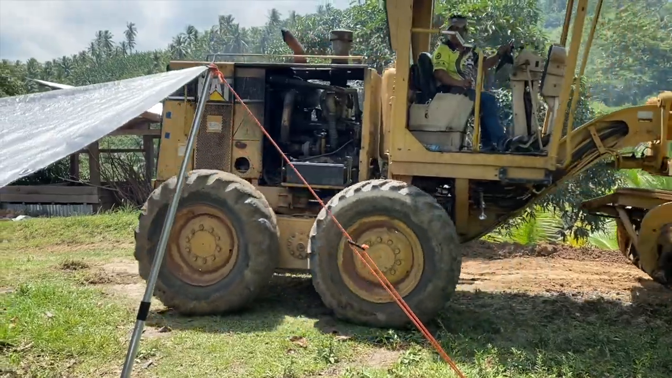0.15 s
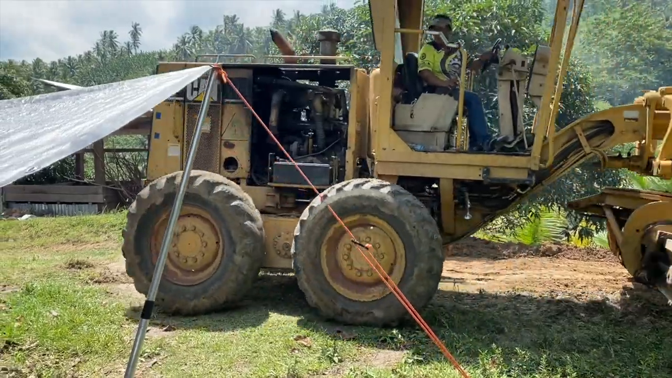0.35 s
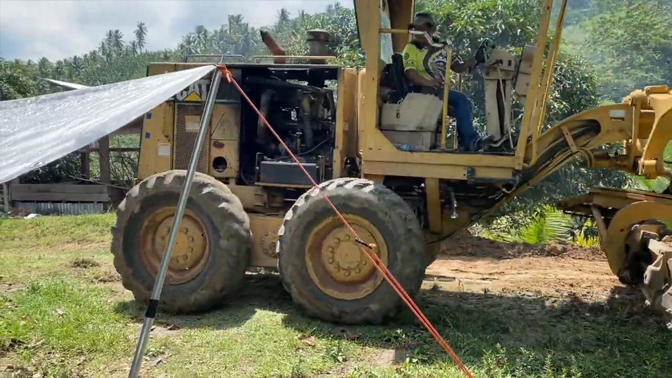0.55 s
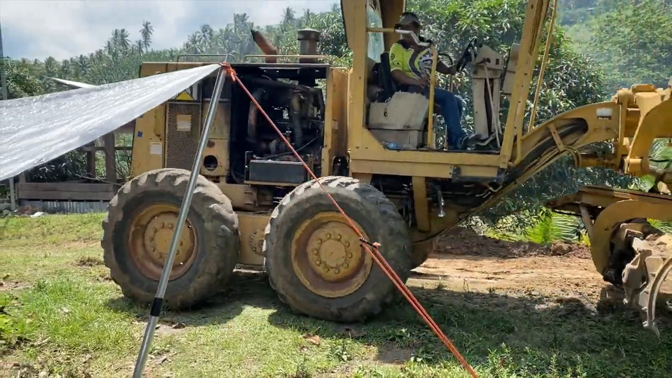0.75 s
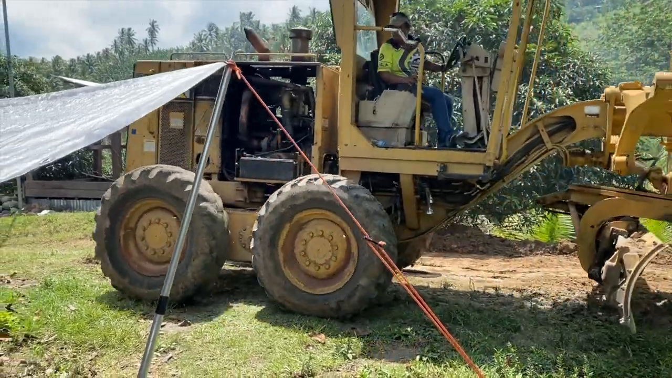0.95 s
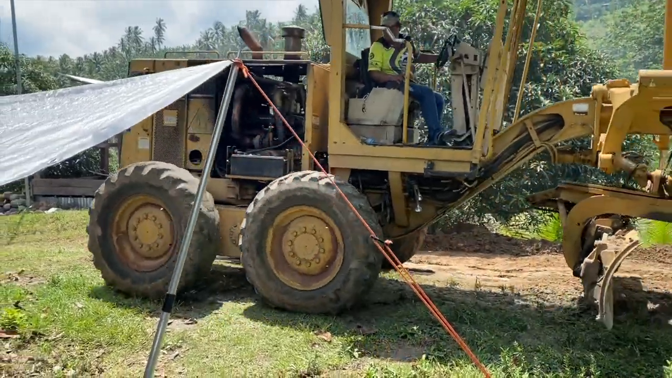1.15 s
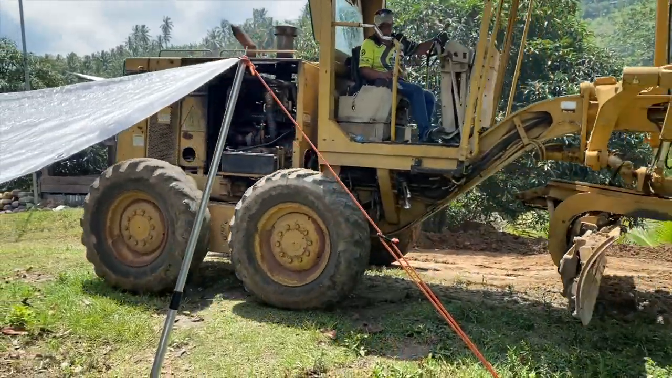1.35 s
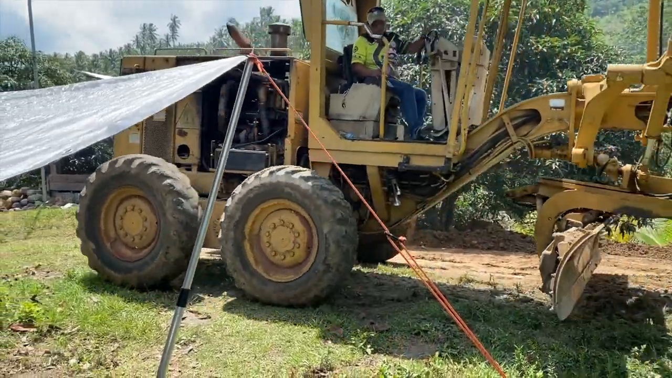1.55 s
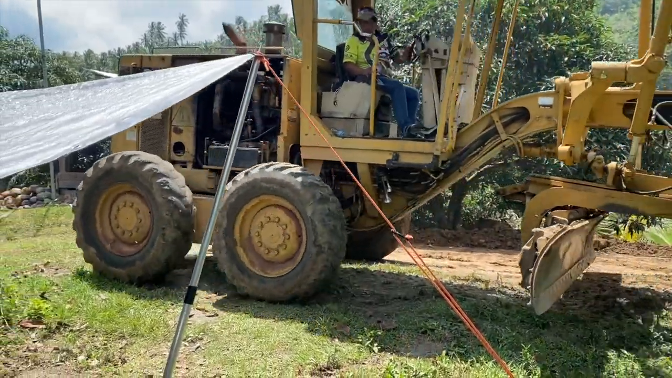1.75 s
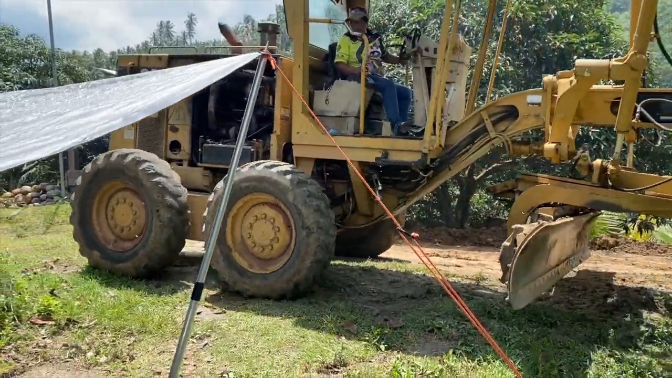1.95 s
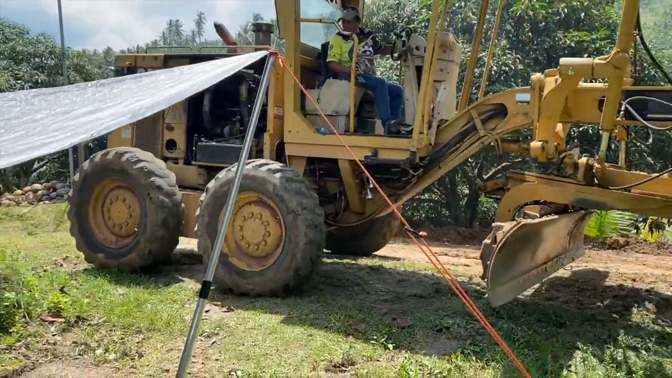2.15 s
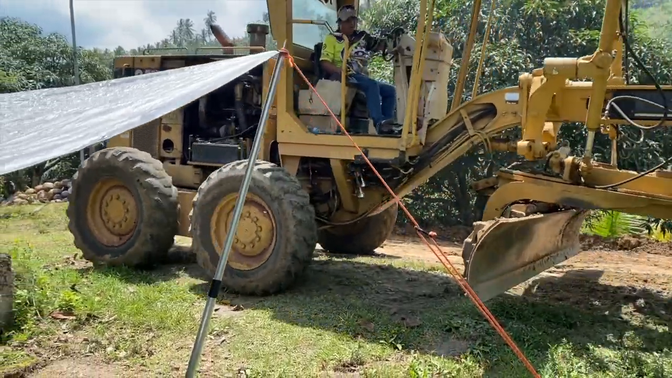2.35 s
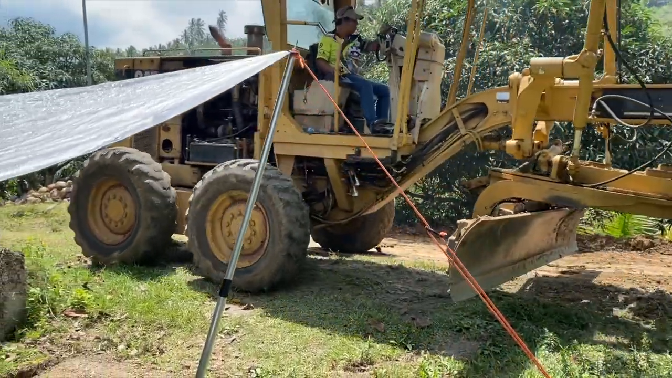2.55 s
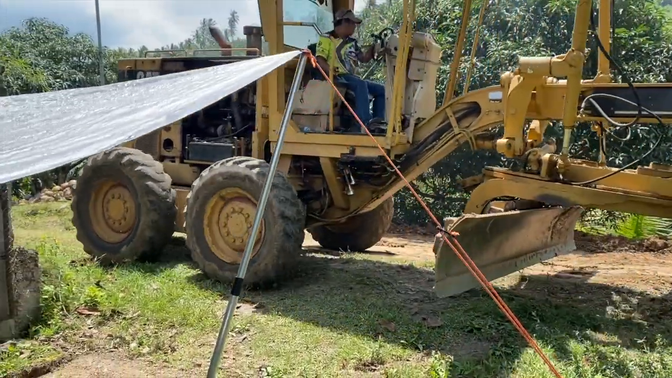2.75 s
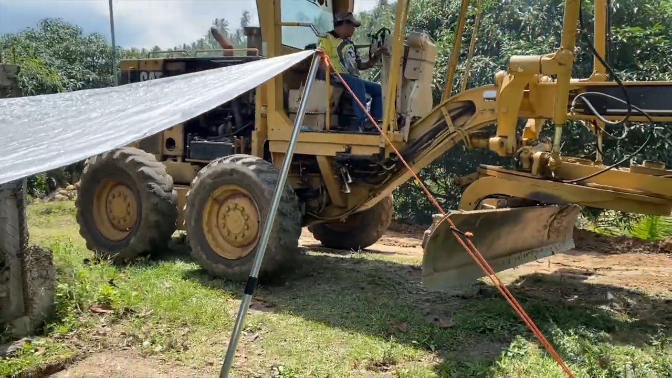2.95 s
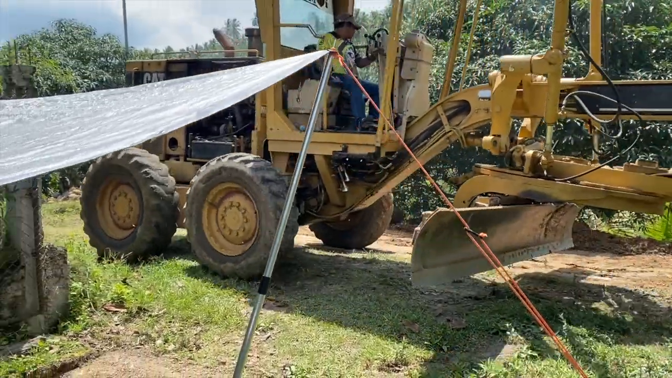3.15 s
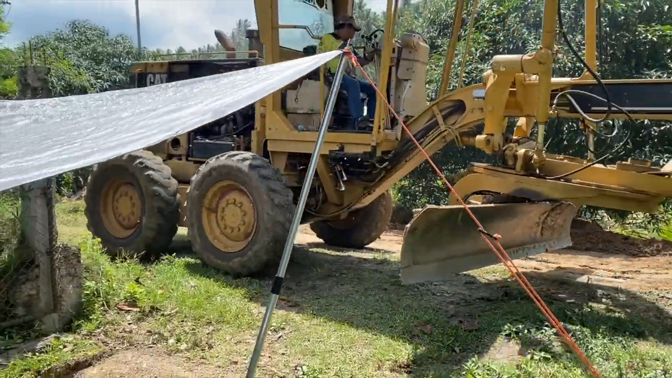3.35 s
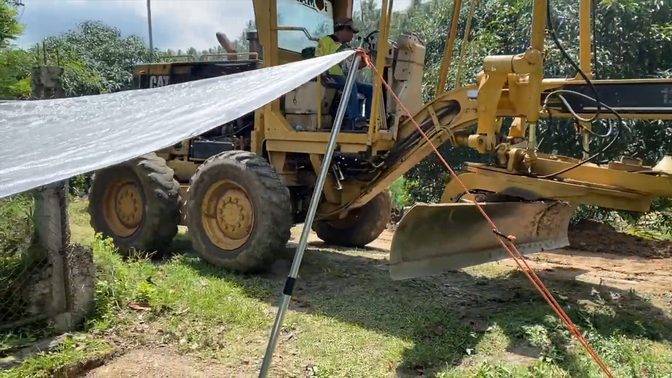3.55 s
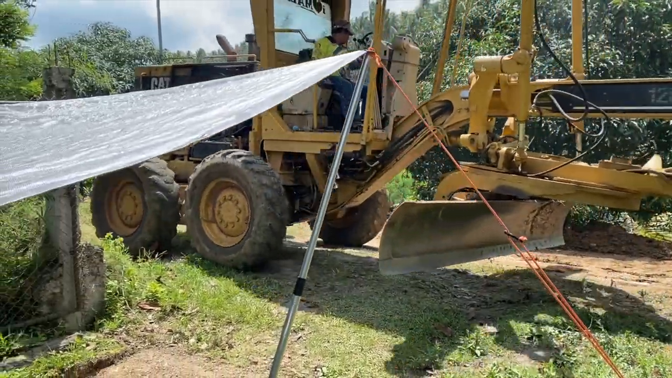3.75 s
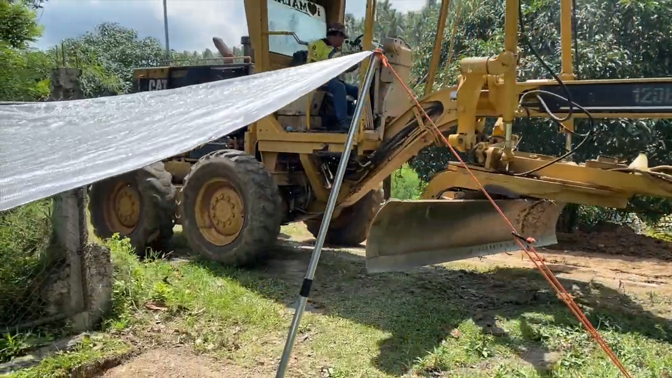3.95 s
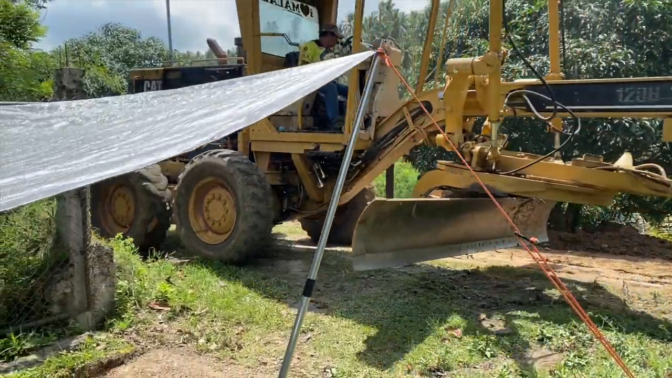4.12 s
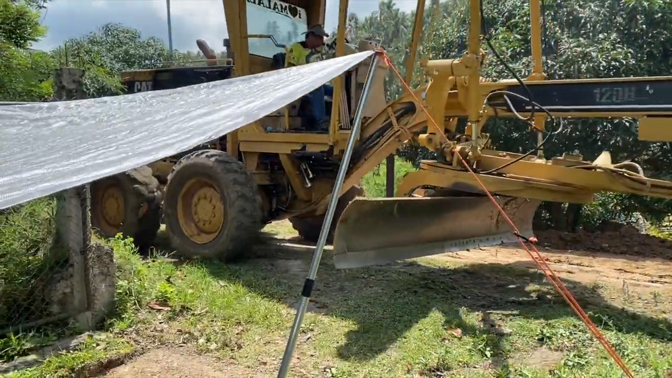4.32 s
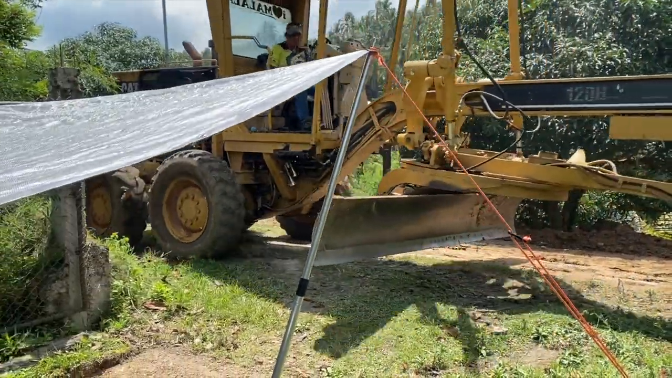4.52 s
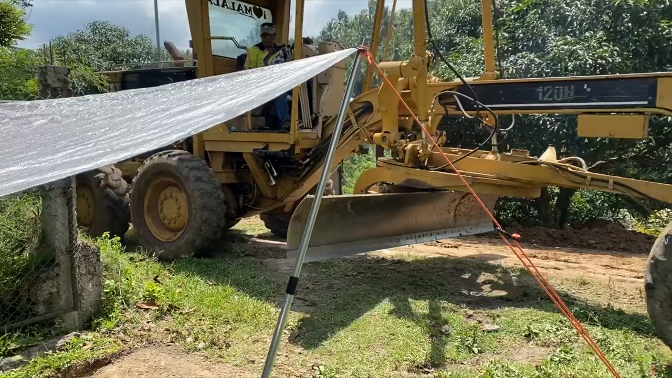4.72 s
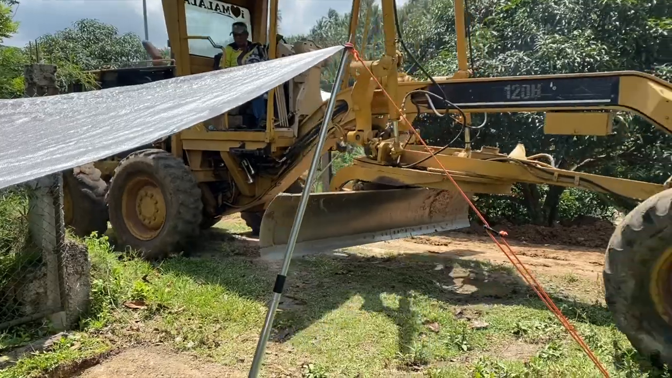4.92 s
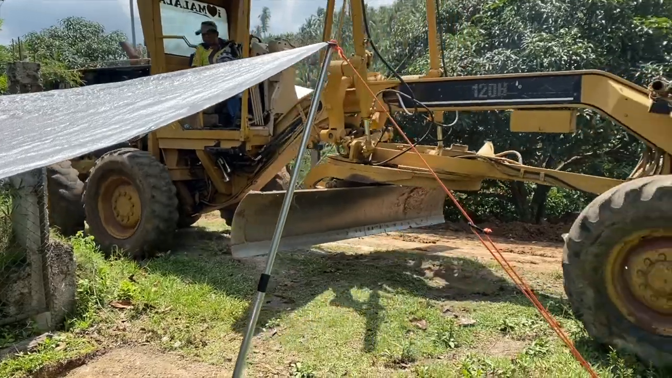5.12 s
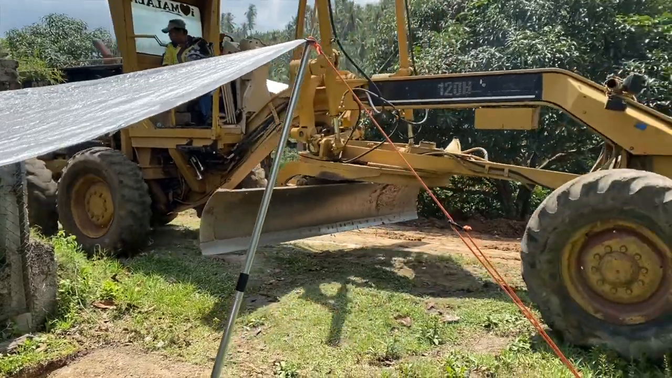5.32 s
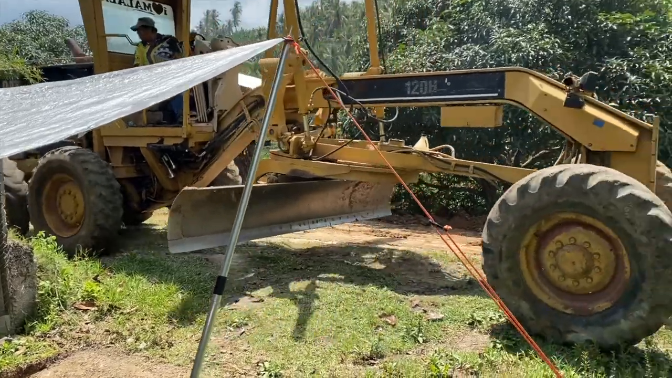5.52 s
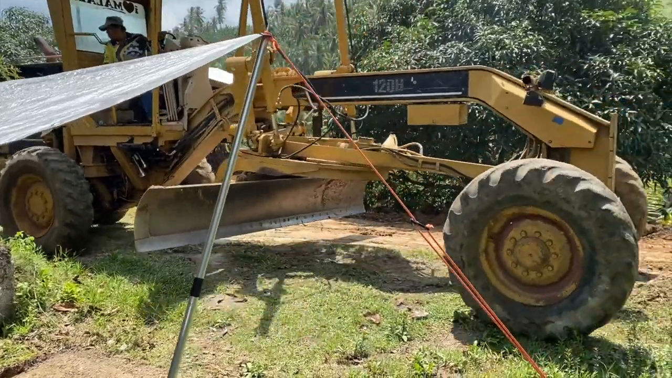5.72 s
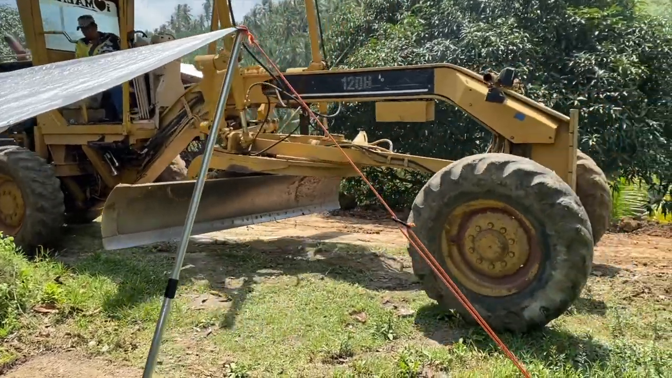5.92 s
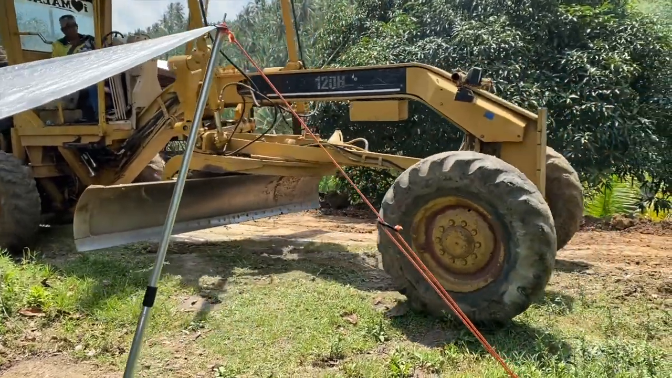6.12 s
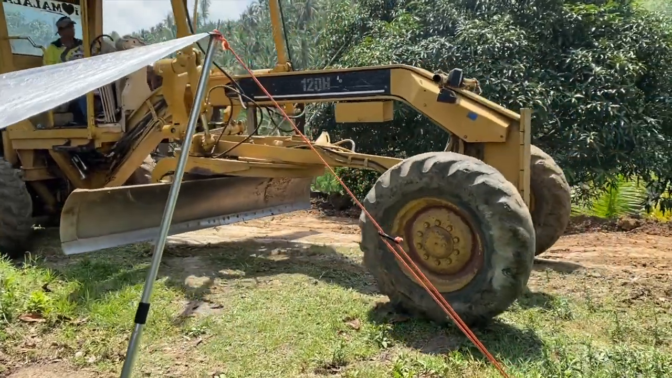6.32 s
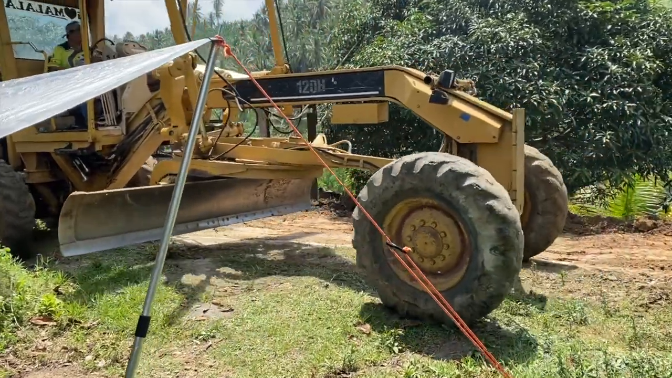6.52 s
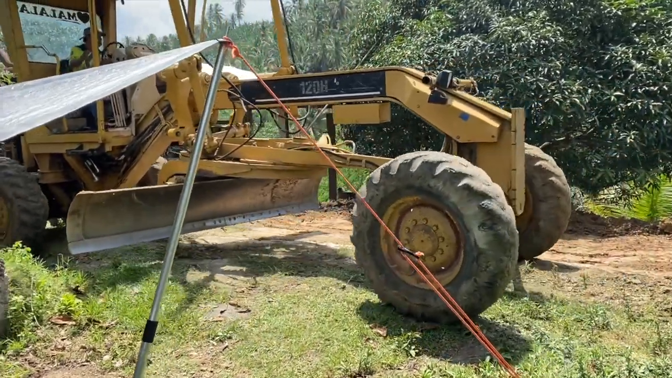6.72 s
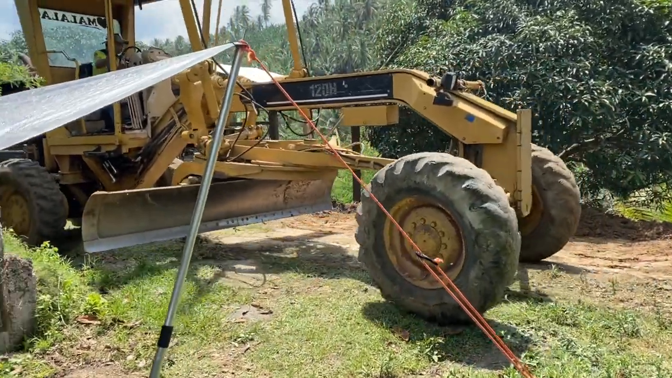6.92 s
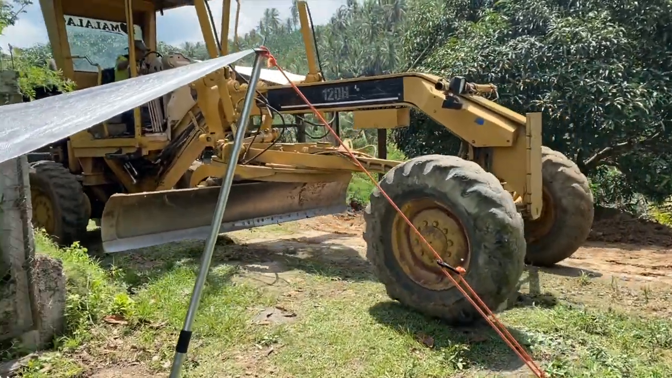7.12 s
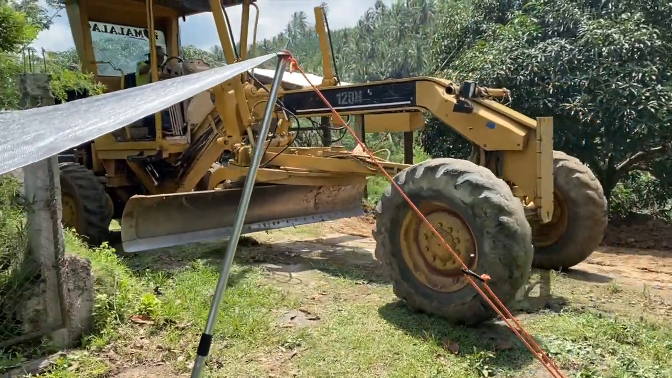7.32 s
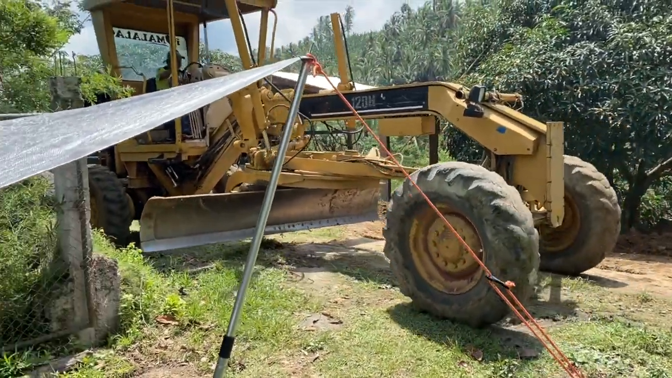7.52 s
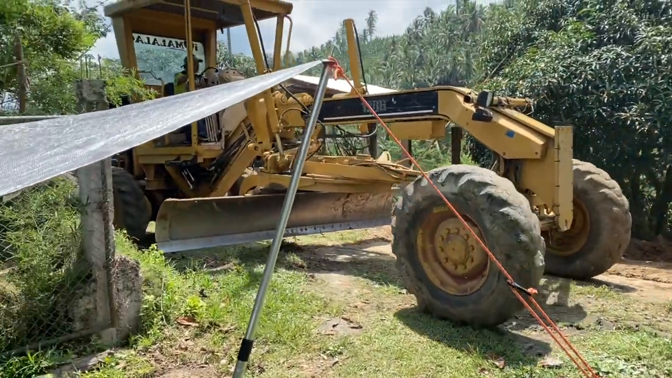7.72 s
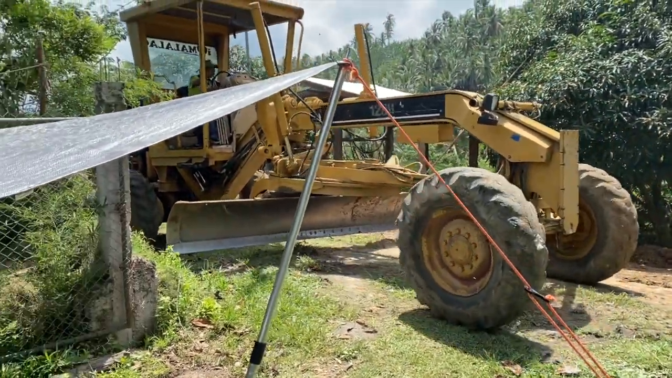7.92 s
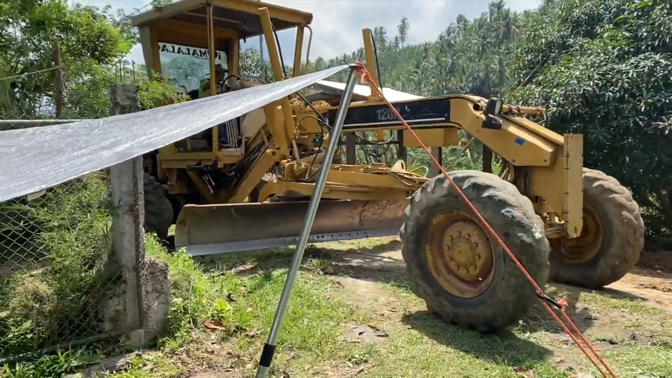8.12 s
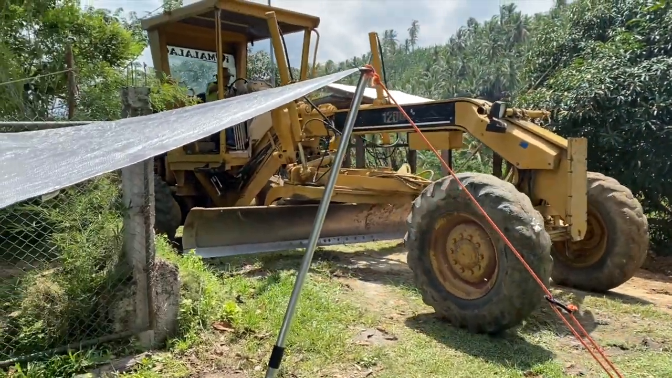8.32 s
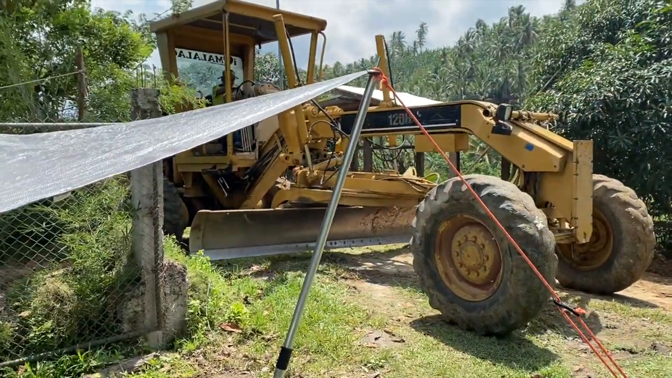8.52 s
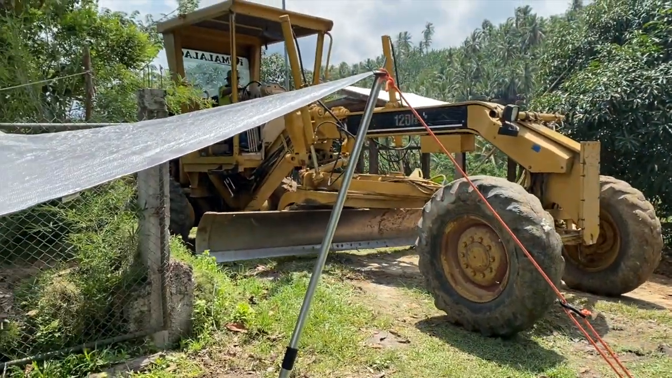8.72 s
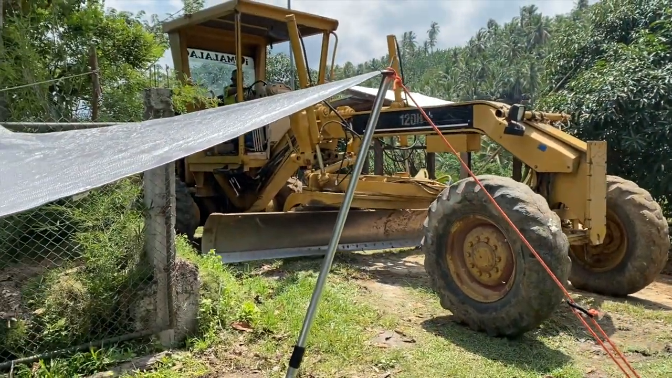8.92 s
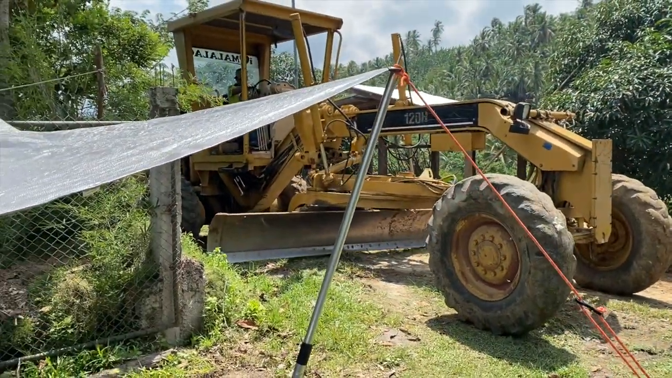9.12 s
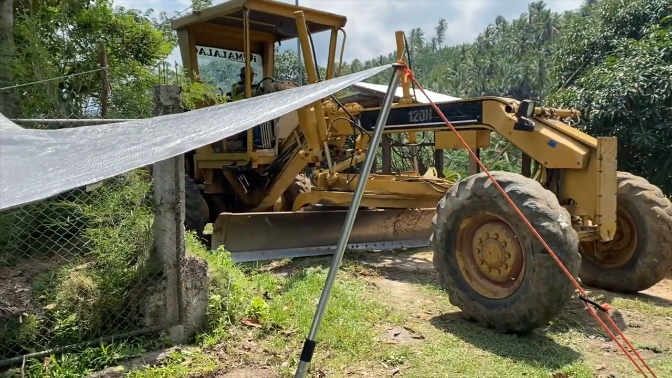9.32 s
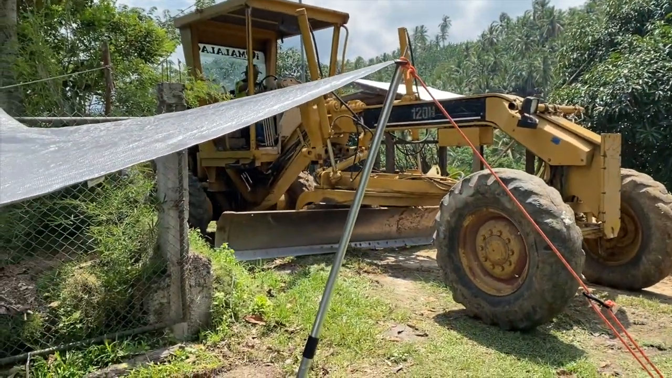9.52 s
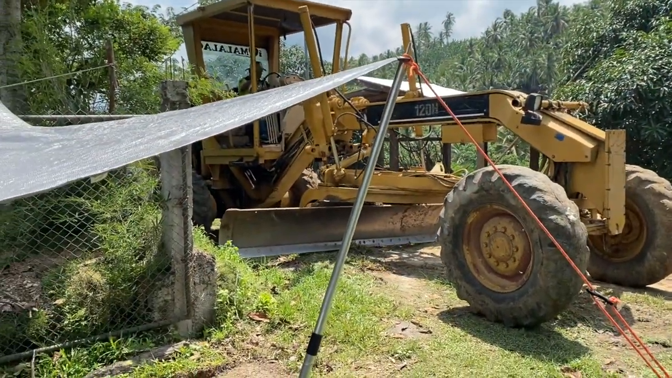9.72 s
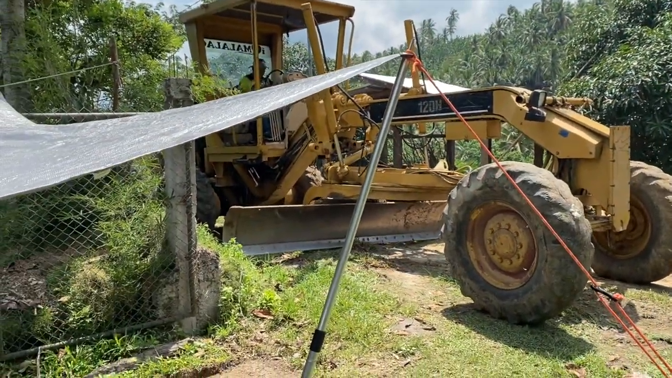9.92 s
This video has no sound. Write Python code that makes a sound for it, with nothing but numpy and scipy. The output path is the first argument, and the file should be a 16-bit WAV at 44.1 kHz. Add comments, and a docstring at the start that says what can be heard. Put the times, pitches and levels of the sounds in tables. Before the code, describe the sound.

Close by, a big road-grading machine rumbles slowly past with rattling diesel and gear whine, stops with a groan, and idles, knocking a loose panel.

```python
"""On a dirt track a motor grader with a six-cylinder diesel backs slowly past, a few metres away, and drops to idle.
Sines drone at the firing rate and whine at the gear meshes; filtered noise that partly repeats with the engine cycle
clatters, rumbles and ticks, changing colour as the open engine bay turns away behind the cab.
A tyre bumps, air hisses, the brakes groan, the frame thuds, and the idling engine knocks a loose panel;
near the end comes a faint, very high tick of band-limited noise."""
import sys
import numpy as np
from scipy import signal
from scipy.fft import rfft, irfft, next_fast_len
from scipy.io import wavfile
from scipy.ndimage import map_coordinates

SR = 44100
rng = np.random.default_rng(int(sys.argv[2]) if len(sys.argv) > 2 else 0)


def int16_out(signal):
    """Quantize to a 16-bit WAV file."""
    q = np.round(np.clip(np.atleast_2d(signal).T, -1, 1) * 32767)
    wavfile.write(sys.argv[1], SR, q.astype(np.int16))


N = 439236
T = np.arange(N) / SR
PADDED = next_fast_len(N, real=True)
FREQS = np.fft.rfftfreq(PADDED, 1 / SR)

# brake groans: (start [s], end [s], slip rate [Hz], its rise [Hz/s], level [dB], unevenness [0-1], resonance [Hz])
GROANS = [(7.249, 7.648, 56.75, 7.5, -34, 0, 305), (8.422, 8.64, 53, 2, -29.5, .25, 170)]
# modes of the loose panel: (frequency [Hz], width [Hz], relative level [dB])
PANEL = [(877, 68, -7), (1027, 77, -1.5), (1115, 66, 3.5), (1240, 63, -2), (1520, 56, -12.5)]


def undb(db):
    """Decibels to gain."""
    return 10 ** (np.asarray(db) / 20)


def unit(x):
    """Scale to rms 1."""
    return x / np.sqrt(np.mean(x ** 2))


def curves(rows):
    """Each column of a table, joined by straight lines in time."""
    s, *columns = np.transpose(rows)
    return [np.interp(T, s, column) for column in columns]


def ramp(start, length):
    """From 0 to 1 in a straight line."""
    return np.clip((T - start) / length, 0, 1)


def swell(start, end, edge):
    """A gate with soft edges."""
    return np.clip(np.minimum(T - start, end - T) / edge + .5, 0, 1)


def spells(rows, fade_db_per_s):
    """Level in dB that holds through each spell and falls evenly before and after it."""
    levels = []
    for start, end, db in rows:
        seconds_outside = np.maximum(np.maximum(start - T, T - end), 0)
        levels.append(db - fade_db_per_s * seconds_outside)
    return np.max(levels, axis=0)


def walk(rate):
    """Smooth random wander of rms 1, with `rate` random points a second."""
    knots = rng.standard_normal(int(rate * N / SR) + 4)
    coarse = map_coordinates(knots, [T[::50] * rate], order=2, mode="nearest")
    return unit(coarse).repeat(50)[:N]


def response(points):
    """Gain at every frequency from (frequency [Hz], gain [dB]) points."""
    hz, db = np.transpose(points)
    return undb(np.interp(np.log(FREQS + 1), np.log(hz), db))


def resonance(hz, width_hz):
    """Response of one damped mode."""
    damping = 1j * FREQS * width_hz
    return damping / (hz ** 2 - FREQS ** 2 + damping)


def modes(table, centre_hz, spread_hz):
    """Response of a ringing sheet, gain 1 for white noise."""
    sheet = sum(undb(db) * resonance(hz, width) for hz, width, db in table)
    sheet = sheet * resonance(centre_hz, spread_hz)
    return sheet / np.sqrt(np.mean(abs(sheet) ** 2))


def through(x, gain):
    """Filter by a response."""
    return irfft(rfft(x, PADDED) * gain, PADDED)[..., :N]


def scatter(x, smear_s):
    """Reflections inside the steel bay blur each blow over a few milliseconds."""
    echoes = rfft(rng.standard_normal(N) * np.exp(-T / smear_s), PADDED)
    return through(x, echoes / abs(echoes))  # phases only, so the colour stays


def rattle(firings, repeat):
    """Mid and side noise: a share recurs at the same crank angle of every six-firing cycle, the rest is new."""
    size = 6 * 1024
    angle = (firings / 6 * size).astype(int) % size
    recurring = rng.standard_normal((2, size))[:, angle]
    fresh = rng.standard_normal((2, N))
    return np.sqrt(repeat) * recurring + np.sqrt(1 - repeat) * fresh


def blows(count_up, decay, between):
    """A sharp rise at each whole count that dies away to a steady rest."""
    return unit(np.exp(-(count_up % 1) / decay) + between)


def throttle():
    """Shares of coasting and of idling: the throttle shuts, the engine coasts, then eases into idle."""
    cut_s, cut_fall_s, coast_s, recover_s = 6.78, 0.11, 0.39, 0.6
    idle = ramp(cut_s + cut_fall_s + coast_s, recover_s)
    return ramp(cut_s, cut_fall_s) - idle, idle


def heard(layer):
    """A layer's level in dB: it falls with distance, shifts behind the cab, and follows the engine's effort.

    The layer lists (level when nearest [dB], then changes: behind the cab, under load, coasting, at idle [dB])."""
    near_db, shade_db, load_db, coast_db, idle_db = layer
    # distance of the track, how far past us the engine starts, its speed, and when it stands
    track_m, start_m, speed_m_s, stops_s = 5.93, 1.32, 1.305, 6.9
    # the cab slides in front of the engine between these times: (start [s], end [s])
    shade_s = [1.93, 6.16]
    # extra load, pulling away and again before the stop: (time [s], load [0-1])
    load_rows = [(0, 0.56), (.5, 0.5), (1.5, 0.02), (5.3, 0.48), (6.1, 0.7), (6.75, 1), (6.9, 0.4)]
    distance = np.hypot(track_m, start_m + speed_m_s * np.minimum(T, stops_s))
    shade = ramp(shade_s[0], shade_s[1] - shade_s[0])
    load, = curves(load_rows)
    coast, idle = throttle()
    place_db = near_db - 20 * np.log10(distance / track_m) + shade_db * shade
    return place_db + load_db * load + coast_db * coast + idle_db * idle


def exhaust(firings, waver_db=0.56, coast_waver_db=0.0, octave_waver_db=-0.2, upper_waver_db=2.2):
    """The pipe's drone: a strong fundamental that lopes with the engine cycle, under weaker harmonics."""
    # drone at the firing rate: (time [s], fundamental [dB], octave [dB])
    drone_rows = [(0, -17, -24), (.7, -17.5, -26.5), (1.6, -17.5, -30.5), (2.2, -17.5, -29.5),
                  (2.7, -20, -32), (3.8, -19, -34), (4.1, -22, -34.5), (5.3, -24, -36.5),
                  (6.1, -22.5, -27.5), (6.77, -22.5, -28.5), (6.95, -36, -39), (7.35, -31.5, -42),
                  (7.7, -24, -36), (8.1, -22.5, -30.5), (8.5, -26.5, -31.5), (8.9, -21.5, -28),
                  (9.3, -25.5, -29), (9.96, -25, -29.5)]
    # higher harmonics: (multiple of the engine cycle)
    orders = [18, 24, 30, 34, 36]
    # their strength: (relative level [dB], share of the boom that each takes [0-1])
    strengths = [(-9, .9), (0, 0.94), (-4, 0.06), (-7, 0.6), (-3, 0.3)]
    # level of the higher harmonics, as in heard(): (nearest, behind cab, load, coasting, idle [dB])
    upper_layer = (-37.5, -7.5, 1.5, -9, 3)
    # the higher harmonics boom for a moment: (start [s], end [s], gain [dB])
    boom_spell = (2.71, 4.04, 8.7)
    usual_lope, deep_start_s, deep_end_s, deeper_by = 0.083, 3.8, 6.8, 0.14  # depths 0-1

    coast, _ = throttle()
    drone_db, octave_db = curves(drone_rows)
    start, end, boom_db = boom_spell
    upper_db = heard(upper_layer)
    boom = boom_db * swell(start, end, edge=0.29)
    lope = usual_lope + deeper_by * swell(deep_start_s, deep_end_s, edge=.4)
    angle = 2 * np.pi * firings
    drone_db = drone_db + waver_db * walk(21) + coast_waver_db * coast * walk(19)
    drone = undb(drone_db) * np.cos(angle) * (1 + lope * np.cos(angle / 6))
    drone += undb(octave_db + octave_waver_db * walk(13)) * np.sin(2 * angle)
    for order, (db, share) in zip(orders, strengths):
        level_db = upper_db + db + share * boom + upper_waver_db * walk(11)
        drone += undb(level_db) * np.cos(order * angle / 6)
    return np.sqrt(2) * drone  # a sine of peak sqrt(2) has rms 1


def whine(firing_hz, flutter_db=1.6, backlash=0.14, throb=0.12):
    """Meshing teeth sing at multiples of the gear speed, throb with each crank turn, and backlash shakes their phase."""
    # tones of each gear mesh: (teeth per engine cycle, one or more)
    gear_tones = [
        [73],
        [76],
        [100],
        [102],
        [139],
        [181, 201],
        [300],
    ]
    # spells in which each mesh sings out, in the same order: (start [s], end [s], level of its first tone [dB])
    gear_spells = [
        [(0, .7, -33), (.7, 2.05, -39.5), (2.05, 2.7, -32.5), (2.7, 3.2, -34.5), (3.2, 4.1, -31)],
        [(0, .3, -33), (1.5, 2.8, -37.5), (3.2, 4.4, -39), (7.3, 8.1, -43)],
        [(0, 0.9, -37.5)],
        [(3.45, 4.3, -37.5)],
        [(1.25, 1.95, -36)],
        [(3.1, 3.73, -41)],
        [(1.3, 2.7, -42.5), (3.45, 3.9, -41.5)],
    ]
    # the gear train surges against the engine as the machine rocks: (time [s], share by which it runs ahead)
    surge_rows = [(0, -0.0024), (1.5, -0.0065), (2.0, -0.0016), (2.45, 0.0049), (2.95, -0.0071),
                  (3.4, -.003), (6, -0.0036), (7.15, 0.000018), (7.33, -0.028), (7.7, .001)]
    surge, = curves(surge_rows)
    turns = np.cumsum(firing_hz * (1 + surge)) / SR / 6  # in engine cycles, two crank turns each
    out = 0
    for tones, rows in zip(gear_tones, gear_spells):
        level_db = spells(rows, fade_db_per_s=17.5)
        for teeth in tones:
            mesh = 2 * np.pi * teeth * turns
            tone = np.sin(mesh + backlash * walk(25))
            out = out + undb(level_db + flutter_db * walk(20)) * tone * tones[0] / teeth
    return np.sqrt(2) * out * (1 + throb * np.cos(2 * np.pi * 2 * turns))


def clatter(firings, clatter_db, lag=0.06, blow_decay=0.14, between=1.9):
    """Combustion, injectors and valves shake the block; its colour changes as the bay turns away."""
    # strength of each cylinder's blow: (relative level [dB])
    cylinders_db = [0, 3.5, 1.5, 5, -4.5, 2.5]
    # colour from four sides, each: (frequency [Hz], gain [dB])
    bay_open = [(240, -14), (400, -2), (525, -13), (659, -3), (781, -5), (864, -3), (1020, -5.5),
                (1290, -4), (1560, -11), (2040, -6.5), (2420, -12.5), (2680, -9), (3150, -16.5),
                (4680, -22.5), (6000, -53), (7800, -65), (13200, -120)]
    bay_passing = [(240, -43), (400, -12), (525, -15), (681, -5.5), (789, -6), (957, -12), (1040, -6.5),
                   (1210, -6.5), (1440, -10.5), (1890, -13.5), (2240, -13.5), (2710, -12.5), (3040, -18.5),
                   (5120, -26.5), (6000, -38), (7800, -39), (13200, -120)]
    behind_cab = [(240, -40), (400, -13), (496, -5), (595, -4), (713, 4), (789, -1), (968, 1.5), (1010, 1),
                  (1260, -0.5), (1310, -9), (1610, -5), (1740, -8), (2420, -7.5), (4780, -14.5),
                  (6000, -22), (7800, -51), (13200, -120)]
    idling = [(240, -62), (400, -8), (537, -15.5), (637, -10), (674, -13), (790, -8.5), (946, -10),
              (1120, -8), (1380, -16), (1470, -10.5), (1830, -17), (2090, -14), (3480, -24), (4780, -26.5),
              (6000, -37.5), (7800, -48), (13200, -120)]
    # start and end of each of the three changes of side: (time [s])
    turn_s = [1.8, 3.2, 4.9, 5.7, 7, 7.4]

    strokes = firings - lag
    cylinder_gain = undb(cylinders_db)[strokes.astype(int) % 6]
    force = cylinder_gain * np.exp(-(strokes % 1) / blow_decay) + between
    drive = scatter(rattle(firings, repeat=0.75) * force, smear_s=0.002)
    side = np.interp(T, np.sort(turn_s), [0, 1, 1, 2, 2, 3])
    block = 0
    for k, colour in enumerate((bay_open, bay_passing, behind_cab, idling)):
        share = np.clip(1 - abs(side - k), 0, 1)
        block = block + share * unit(through(drive, response(colour)))
    return block * undb(clatter_db)


def thrum(firings, thrum_db):
    """Frame and covers rumble with the engine cycle, in a colour that shifts from before the stop until after it."""
    # colour while driving, then at rest: (frequency [Hz], gain [dB])
    driving = [(22, -23), (42, 8.5), (70, 5.5), (150, -0.5), (210, 0), (260, -2.5), (300, 3), (350, -4.5),
               (430, -2.5), (520, -8), (800, -57)]
    standing = [(22, -19), (40, 10), (80, 7.5), (160, 5.5), (200, 1), (290, -4.5), (350, -4.5), (430, -2),
                (520, -15), (800, -56)]
    drive = rattle(firings, repeat=0.68)
    rest = ramp(5.5, 2.1)
    frame = (1 - rest) * unit(through(drive, response(driving)))
    frame = frame + rest * unit(through(drive, response(standing)))
    return frame * undb(thrum_db)


def rasp(firings, rasp_db, fizz_db, flicker_db=0.9, fizz_flicker_db=0.9, tick_decay=0.11, between=2.0):
    """Bright ticking of the injectors, one louder than the rest, under a fizz that fades as the bay turns away."""
    # strength of each injector's tick: (relative level [dB])
    injectors_db = [-1, 1, -3, 6, 5, 12]
    # colours of the ticking and of the fizz above it: (frequency [Hz], gain [dB])
    rasp_colour = [(3500, -11), (4400, 6), (5000, 11.5), (5600, 2), (6800, 3), (12000, -12.5)]
    fizz_colour = [(5500, -5), (8000, -2), (11000, 5.5), (15500, 1)]
    injections = firings + .25
    injector_gain = undb(injectors_db)[injections.astype(int) % 6]
    ticks = injector_gain * np.exp(-(injections % 1) / tick_decay) + between
    drive = scatter(rattle(firings, repeat=0.26) * ticks, smear_s=0.004)
    drive = drive * undb(flicker_db * walk(60))
    ticking = unit(through(drive, response(rasp_colour))) * undb(rasp_db)
    fizz = unit(through(drive, response(fizz_colour)))
    return ticking + fizz * undb(fizz_db + fizz_flicker_db * walk(70))


def cover(firings, buzz_db=-4, throb=0.38, looseness=0.48):
    """A steel cover buzzes, and as it comes past sings on one overtone of the cycle, throbbing with each crank turn."""
    # modes of the cover: (frequency [Hz], width [Hz], relative level [dB])
    cover_modes = [(984, 41, -7.5), (1160, 38, -13), (1914, 32, -6)]
    # level of the buzz outside the spells, as in heard(), before buzz_db: (nearest, behind cab, load, coasting, idle [dB])
    buzz_layer = (-28.5, -4, -16, 4, -21)
    # spells in which the cover faces us: (start [s], end [s], level of the tone [dB])
    facing = [(3.4, 5.8, -37), (4.25, 5.15, -31)]
    order = 100  # tone cycles per engine cycle

    tone_db = spells(facing, fade_db_per_s=18)
    level_db = np.maximum(heard(buzz_layer), tone_db)
    drive = rattle(firings, repeat=0.7) * blows(firings / 3, decay=0.21, between=0.55)
    buzz = unit(through(drive, modes(cover_modes, centre_hz=1050, spread_hz=800)))
    tone = np.sin(2 * np.pi * order * firings / 6 + looseness * walk(30))
    tone = tone * (1 - throb * np.cos(2 * np.pi * firings / 3))
    return buzz * undb(level_db + buzz_db) + unit(tone) * undb(tone_db)


def tappets(firings, scatter_db=2):
    """Each rocker knocks at its own point of the cycle and rings its own part of the block."""
    # knocks in every engine cycle: (place in the cycle [0-1], resonance [Hz], width [Hz], relative level [dB])
    rockers = [(0.98, 1293, 179, -3), (.3, 1104, 223, -2.5), (.3, 320, 130, -6), (0.471, 807, 403, -6.5),
               (0.799, 920, 138, -3.5), (0.809, 406, 170, -5.5), (0.951, 2630, 220, -6)]
    # level of the layer, as in heard(): (nearest, behind cab, load, coasting, idle [dB])
    tappet_layer = (-32.5, -4, -6, -4, -6)
    buzz = rattle(firings, repeat=0.84)
    out = 0
    for place, hz, width, db in rockers:
        drive = buzz * blows(firings / 6 - place, decay=0.086, between=0.11)
        ring = unit(through(drive, resonance(hz, width) ** 2))
        out = out + ring * undb(db + scatter_db * walk(9))
    return out * undb(heard(tappet_layer))


def bump(attack_s=0.01):
    """A tyre bumps with a short, dull rumble of resonant noise."""
    # the bump: (time [s], noise level before the envelope [dB], resonance [Hz], decay [s])
    tyre = (2.885, -18.5, 62, 0.14)
    s, db, hz, decay_s = tyre
    rumble = unit(through(rng.standard_normal(N), resonance(hz, hz) ** 2))
    return rumble * undb(db) * ramp(s, attack_s) * np.exp(-np.maximum(T - s, 0) / decay_s)


def hisses():
    """Two short hisses of air, then a faint, very high tick of band-limited noise."""
    # bursts: (centre time [s], length [s], centre frequency [Hz], width [Hz], level [dB])
    bursts = [(6.75, 0.082, 4000, 4500, -40.5), (6.964, 0.024, 5000, 2200, -39),
              (9.79, .04, 14520, 2530, -45)]
    noise = rng.standard_normal((2, N))
    out = 0
    for s, length, hz, width, db in bursts:
        band = unit(through(noise, resonance(hz, width) ** 2))
        out = out + band * undb(db) * swell(s - length / 2, s + length / 2, edge=0.5 * length)
    return out


def brakes(width_hz=220, grind=0.098):
    """The brakes stick and slip in two groans just after the machine has stopped; each slip rings the axle housing."""
    out = 0
    for start, end, slip_hz, rise, db, uneven, ring_hz in GROANS:
        rate = slip_hz + rise * np.clip(T - start, 0, end - start)
        slips = np.floor(np.cumsum(rate * (1 + uneven * walk(70))) / SR)
        drive = np.diff(slips, prepend=0) + grind * np.sqrt(abs(uneven)) * rng.standard_normal(N)
        groan = unit(through(drive, resonance(ring_hz, width_hz) ** 2))
        out = out + groan * undb(db) * swell(start, end, edge=0.07)
    return out


def lining():
    """The brake lining rubs the drum: a narrow band of noise swells and fades with the first groan."""
    # the scrape: (resonance [Hz], width [Hz], level [dB])
    scrape = (2040, 200, -42)
    hz, width, db = scrape
    rub = unit(through(rng.standard_normal((2, N)), resonance(hz, width) ** 2))
    return rub * undb(db) * swell(*GROANS[0][:2], edge=0.21)


def knock(firings, jitter=0.002, scatter_db=.6, chatter=.25):
    """Every idling firing knocks a loose panel in a lumpy pattern that repeats each cycle; it chatters after each blow."""
    # blows on the panel: (place in the engine cycle [0-1], relative level [dB])
    panel_knocks = [(.035, -2.5), (.225, 2), (.375, -5.5), (.535, -13), (.725, -2), (.895, -0.5)]
    # spell in which the panel knocks: (start [s], end [s], level [dB])
    knock_spells = [(7.3, 9.96, -33.5)]
    taps, shaking = 0, 0
    for place, db in panel_knocks:
        cycles = firings / 6 - place + jitter * walk(9)
        taps = taps + undb(db) * np.diff(np.floor(cycles), prepend=np.floor(cycles[0]))
        shaking = shaking + undb(db) * blows(cycles, decay=0.073, between=0.02)
    drive = unit(taps) + chatter * unit(shaking) * rattle(firings, repeat=0.44)
    out = 0
    for hz, width, db in PANEL:
        ring = unit(through(drive, resonance(hz, width) * resonance(hz, 2 * width)))
        out = out + ring * undb(db + scatter_db * walk(12))
    return unit(out) * undb(spells(knock_spells, fade_db_per_s=31))


def thuds(scatter_db=1.5, softness=3.5):
    """Slack in the drive and frame is taken up in soft, heavy blows, each with its own mix of the frame's modes."""
    # modes of the frame: (frequency [Hz], width [Hz], relative level [dB])
    frame_modes = [(147, 26, -3), (202, 25, -0.5), (263, 30, -3), (329, 34, -3.5), (465, 48, -11)]
    # blows: (time [s], peak level [dB])
    blow_rows = [(8.434, -18), (8.468, -16.5), (8.516, -18), (8.54, -18), (8.576, -21.5), (8.607, -20),
                 (8.624, -23), (8.658, -25), (8.714, -23)]
    rings = []
    for hz, width, _ in frame_modes:
        rings.append(irfft(resonance(hz, width) * resonance(hz, softness * width), PADDED)[:N])
    rings = np.array(rings)
    rings /= abs(rings).max(axis=1, keepdims=True)
    chances = rng.standard_normal((len(blow_rows), len(frame_modes)))
    out = np.zeros(N)
    for (s, db), chance in zip(blow_rows, chances):
        ring = undb(np.array(frame_modes)[:, 2] + scatter_db * chance) @ rings
        start = int(s * SR)
        out[start:] += undb(db) * ring[:N - start] / abs(ring).max()
    return out


def clanks(damping=1.1):
    """A harder blow on the loose panel: one impulse rings all its modes."""
    # blows: (time [s], peak level [dB])
    clank_rows = [(9.602, -15)]
    ring = sum(undb(db) * resonance(hz, width * damping) for hz, width, db in PANEL)
    ring = ring * resonance(996, 610) ** 2
    out = 0
    for s, db in clank_rows:
        impulse = 1. * (np.arange(N) == int(s * SR))
        hit = through(impulse, ring)
        out = out + hit / abs(hit).max() * undb(db)
    return out


def scene():
    """One crankshaft drives the engine layers; the wide machine spreads its noise between left and right."""
    # engine speed, dropping sharply near 7 s, rebounding a little and settling: (time [s], firing rate [Hz])
    speed = [(0, 52), (0.2, 52.43), (0.6, 54.82), (0.85, 54.14), (1.15, 53.53), (2.05, 54.03), (2.6, 55.99),
             (2.8, 55.49), (3.1, 54.28), (3.9, 56.03), (4.3, 57), (5.3, 57.18), (6.79, 57.77), (7.0, 50.3),
             (7.15, 50.8), (7.33, 52.3), (7.7, 49.93), (8.4, 48.72), (9.96, 48.11)]
    # levels of the layers, as in heard(): (nearest, behind cab, load, coasting, idle [dB])
    clatter_layer = (-22.5, -2, 1, -2, -0.65)
    thrum_layer = (-28.5, 2.54, 0.3, 2, 0.2)
    rasp_layer = (-42, -2.5, 6, 1, -2)
    fizz_layer = (-37, -9, 1, 1, 0)
    # unrelated share of the two channels: (frequency [Hz], side gain [dB])
    width_points = [(60, -24), (125, -17), (250, -14), (500, -12), (1000, -9), (2000, -10), (4000, -4.5),
                    (8000, -10), (12000, -11)]
    # balance of the channels: (frequency [Hz], left minus right [dB])
    tilt_points = [(60, -0.2), (110, -2), (200, -.5), (380, 0), (700, 3), (1290, 1), (2380, 2.5), (4400, 5),
                   (8120, -0.5), (15000, 0.5)]
    # phase between the channels: (frequency [Hz], lead of the left [rad])
    lead_points = [(0, 0), (1550, 1.1), (4130, 0.2), (4570, 0.3), (7490, -0.0), (8350, -3.0), (9560, -3.2),
                   (10400, -6.1), (11600, -6.3), (12500, -9.0), (13700, -9.6), (14100, -10.3),
                   (14600, -12.5), (15200, -12.6)]

    firing_hz, = curves(speed)
    firings = np.cumsum(firing_hz) / SR
    # the whole body shakes harder during the first brake groan
    shudder_db = 2 * swell(*GROANS[0][:2], edge=0.13)
    wide = clatter(firings, heard(clatter_layer) + shudder_db)
    wide = wide + thrum(firings, heard(thrum_layer) + shudder_db)
    wide = wide + rasp(firings, heard(rasp_layer), heard(fizz_layer))
    wide = wide + cover(firings) + tappets(firings) + hisses() + lining() + knock(firings)
    mid, side = wide
    mid = mid + exhaust(firings) + whine(firing_hz) + bump() + brakes() + thuds() + clanks()

    side = through(side, response(width_points))
    lean = np.sqrt(response(tilt_points))
    lag = np.exp(-1j * np.interp(FREQS, *np.transpose(lead_points)))
    return np.array([through(mid + side, lean), through(mid - side, lag / lean)])


def record(dry):
    """A steep low-pass cuts the very top."""
    low_pass = signal.ellip(8, .2, 70, 15750, fs=SR, output="sos")  # order, ripple dB, stop dB, edge Hz
    return signal.sosfilt(low_pass, dry)


dry = scene()
out = record(dry)
int16_out(out)
```